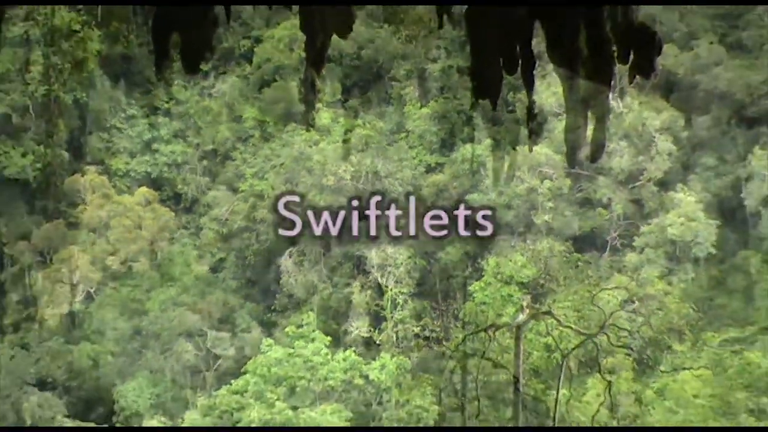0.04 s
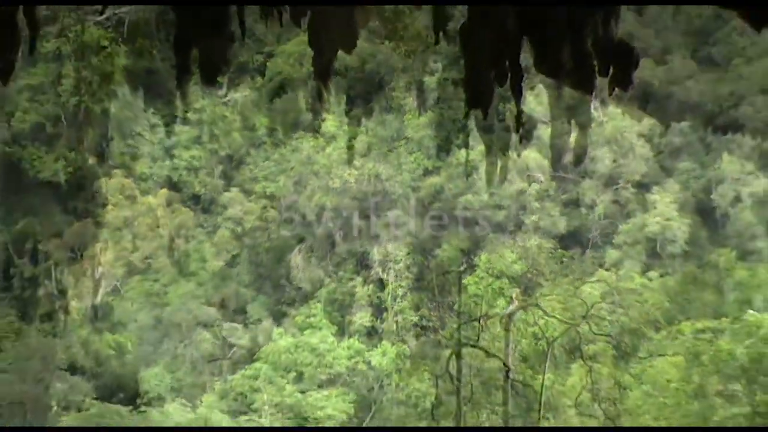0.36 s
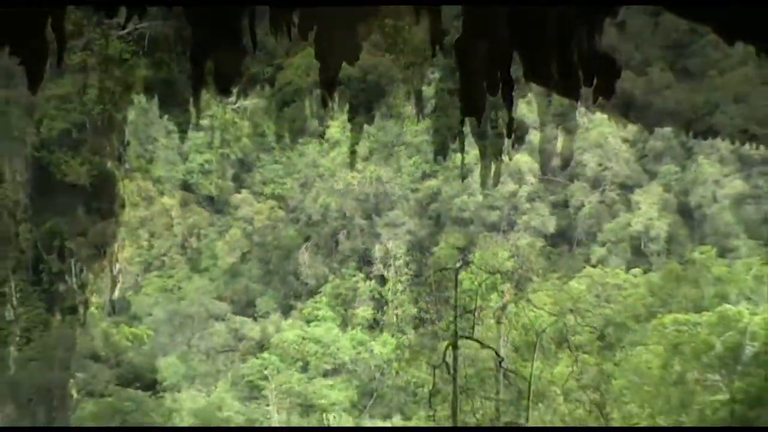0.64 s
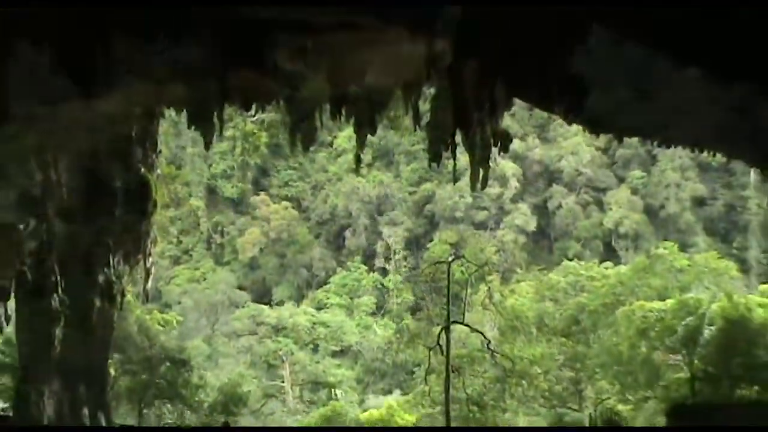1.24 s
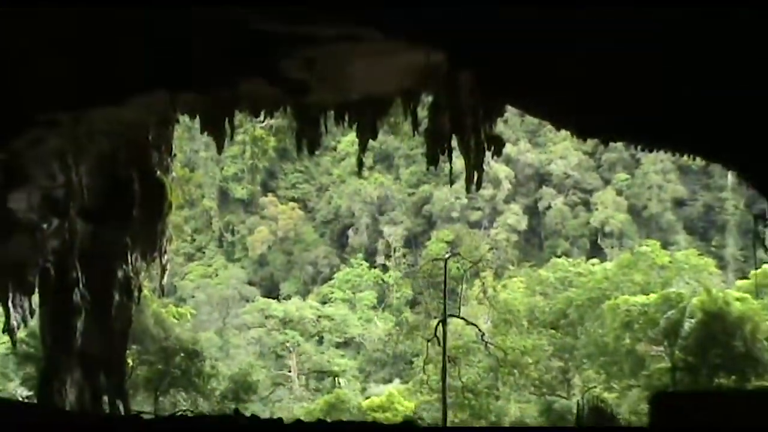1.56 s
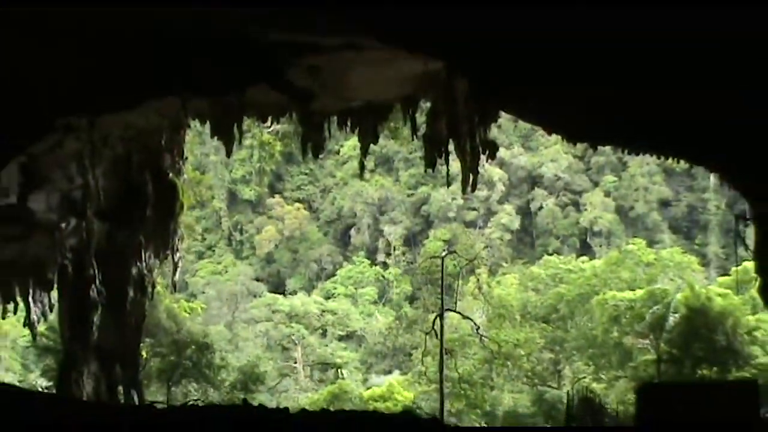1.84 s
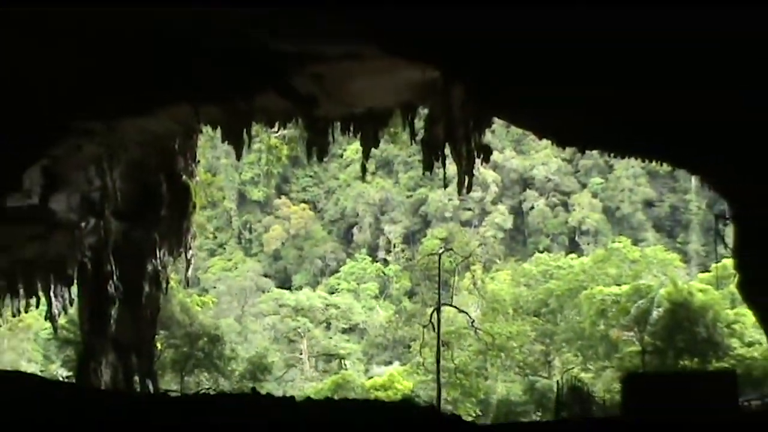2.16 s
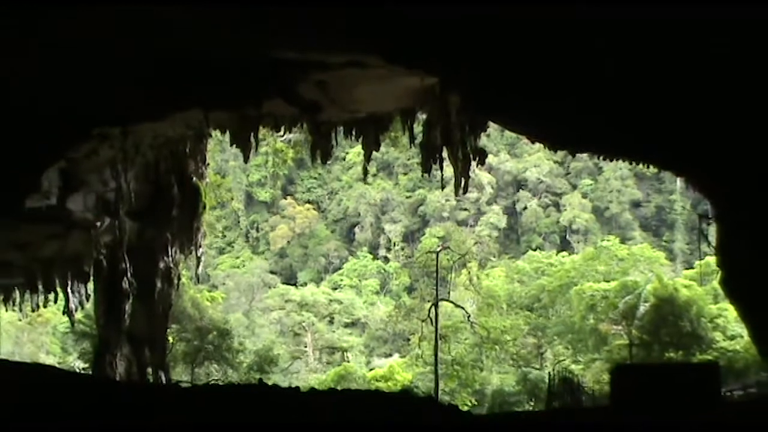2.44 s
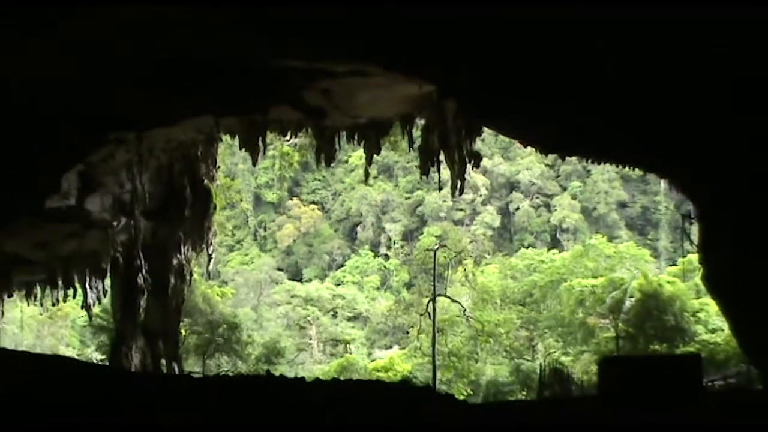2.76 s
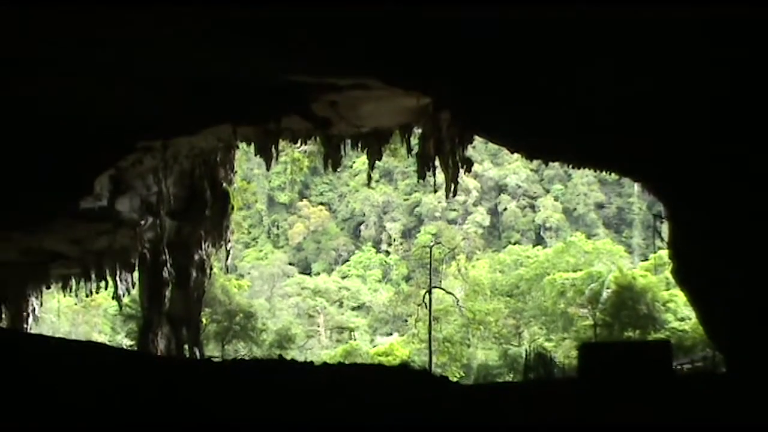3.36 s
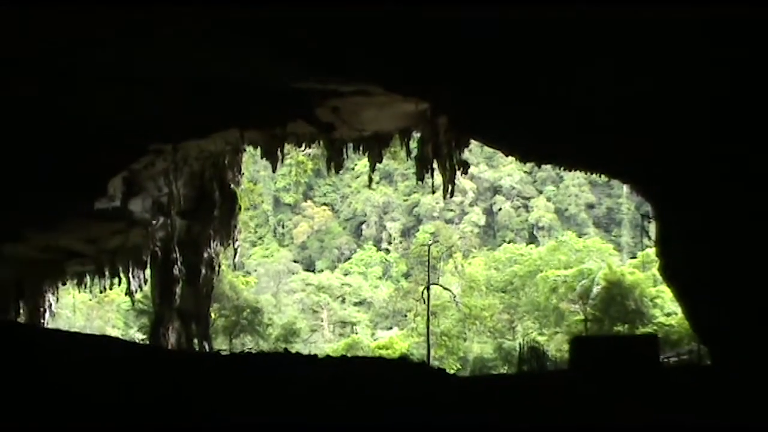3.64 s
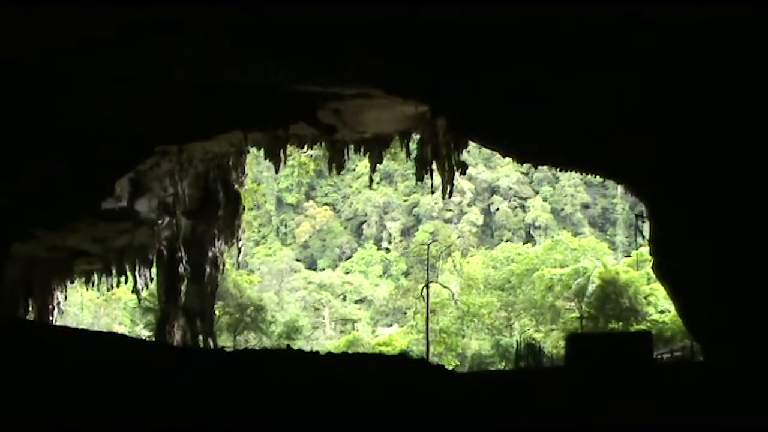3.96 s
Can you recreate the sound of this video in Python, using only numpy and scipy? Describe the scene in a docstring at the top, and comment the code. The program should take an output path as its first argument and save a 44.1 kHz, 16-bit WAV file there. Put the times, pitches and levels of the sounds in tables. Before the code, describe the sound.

Many small birds click and twitter in a cave, merging into a steady rain-like patter and hiss. Sharp clicks close to the microphone, brief squeals and one quick rattle stand out, echoing over a faint rumble of air.

```python
"""Swiftlets in a cave mouth

A colony echolocates with short pips near 6 kHz, which superpose into a rain-like patter and a hiss.
A few birds click close by; others chirp, twitter, squeal and rattle in brief, gliding tones.
Reflections from the rock prolong the calls, over a low rumble of air and a few soft knocks and scuffs."""
import sys
import numpy as np
from scipy import signal
from scipy.fft import rfft, irfft
from scipy.io import wavfile
from scipy.ndimage import uniform_filter1d

SR = 44100
rng = np.random.default_rng(int(sys.argv[2]) if len(sys.argv) > 2 else 0)


def waveform_to_disk(signal):
    """Save audio, clipped to [-1, 1], as 16-bit WAV at the path in sys.argv[1]."""
    frames = np.transpose(np.atleast_2d(signal))
    scaled = np.clip(frames, -1, 1) * 32767
    samples = np.round(scaled).astype(np.int16)
    wavfile.write(sys.argv[1], SR, samples)


N = 176400
TIME = np.arange(N) / SR
SIDE_DB = -11  # side relative to middle, for the birds and their echoes
WAVER = .024  # rms pitch deviation of a call, as a fraction


def amp(db):
    """Decibels to amplitude ratio."""
    return 10 ** (np.asarray(db) / 20)


def unit(x):
    """Normalisation to an rms of 1."""
    return x / np.sqrt(np.mean(x ** 2) + 1e-20)


def curve_at(points, hz):
    """Interpolation on a logarithmic frequency axis."""
    f, value = np.transpose(points)
    return np.interp(np.log(hz + 1), np.log(f + 1), value)


def add(mix, start, sound):
    """Superposition: a sound joins the mix at a time in seconds."""
    part = mix[..., max(round(start * SR), 0):][..., :sound.shape[-1]]
    part += sound[..., :part.shape[-1]]


def stereo(mid, side):
    """Sum and difference of middle and side give left and right."""
    return np.array([mid + side, mid - side])


def filtered(x, gains):
    """Linear filtering: each frequency is scaled by a gain curve in dB."""
    return irfft(rfft(x) * amp(curve_at(gains, np.fft.rfftfreq(N, 1 / SR))), N)


def noise(spectrum, patch_db=0, flicker_db=0):
    """Modulated noise of rms 1: its level drifts in patches of the spectrum and flickers as a whole."""
    bands = signal.stft(filtered(rng.standard_normal(N), spectrum), nperseg=256, noverlap=192)[2]
    patches = uniform_filter1d(rng.standard_normal(bands.shape), size=5, axis=0)
    patches = unit(uniform_filter1d(patches, size=28, axis=1))
    flicker = unit(uniform_filter1d(rng.standard_normal(bands.shape[1]), size=24))
    bands *= amp(patch_db * patches + flicker_db * flicker)
    return unit(signal.istft(bands, nperseg=256, noverlap=192)[1][:N])


def reflections(mid, side):
    """A diffuse stereo impulse response, normalised to unit energy in the middle."""
    return stereo(mid, amp(SIDE_DB) * side) / np.linalg.norm(mid)


# Each row: frequency in Hz, time to decay by 60 dB in seconds.
REVERB_TIMES = [(500, 3.1), (3000, 1.8), (6000, 0.87), (12000, 0.46)]
def cave(x, wet_db):
    """Reverberation: diffuse reflections decay exponentially, fastest in the treble."""
    hz, t, bands = signal.stft(rng.standard_normal((2, SR)), SR, nperseg=256)
    decay = amp(-60 * t / curve_at(REVERB_TIMES, hz)[:, None])
    tail = reflections(*signal.istft(bands * decay, SR, nperseg=256)[1])
    return x + amp(wet_db) * signal.fftconvolve(np.atleast_2d(x), tail, axes=1)[:, :N]


def ledges(x, direct_db, decay_s=.011):
    """Scattering: ledges around a hidden bird give its call a short, rough trail."""
    t = np.arange(SR // 10) / SR
    trail = reflections(*rng.standard_normal((2, len(t))) * np.exp(-t / decay_s))
    response = trail + amp(direct_db) * (t == 0)
    return signal.fftconvolve(x[None], response, axes=1)[:, :N] / np.hypot(1, amp(direct_db))


# Middle and side spectra of the air. Each row: frequency in Hz, relative spectral density in dB.
AIR_MID_SPECTRUM = [(15, -21), (30, -8), (52, -1.5), (100, -4.5), (170, -10), (400, -13.5), (1000, -17),
                    (2000, -17.5), (5000, -52)]
AIR_SIDE_SPECTRUM = [(15, -33), (55, 1), (120, -1.5), (250, 4.5), (500, 7.5), (1000, 9.5), (2000, 5),
                     (5000, -46)]
def air(pan_db=-.5):
    """Decorrelation: independent middle and side noises make the rumble of cave air sound wide."""
    rumble = stereo(amp(-57) * noise(AIR_MID_SPECTRUM), amp(-61.5) * noise(AIR_SIDE_SPECTRUM))
    return rumble * amp([[pan_db / 2], [-pan_db / 2]])


# Each row: frequency as a multiple of the click's pitch, relative level in dB.
CLICK_PARTIALS = [(.5, -18), (1.001, 2), (1.42, -13), (1.93, -25)]
CLICK_LEAD_S = .002  # time before the peak
def click(hz, half_length_s=.00047, rise=.139, sweep_s=.00074, scatter_s=.0057):
    """An echolocation pulse: a few cycles sweep upwards, then scatter from the nearest rock."""
    t = np.arange(-CLICK_LEAD_S, .03, 1 / SR)
    cycles = np.cumsum(hz * (1 + rise * np.tanh(t / sweep_s))) / SR
    tone = sum(amp(db) * np.sin(2 * np.pi * (k * cycles + rng.random())) for k, db in CLICK_PARTIALS)
    pulse = tone / np.cosh(np.minimum(1.27 * t / half_length_s, 20))
    scatter = reflections(*rng.standard_normal((2, len(t))) * np.exp(-t / scatter_s) * (t > -.001))
    return pulse + amp(-5) * signal.fftconvolve(pulse[None], scatter, axes=1)[:, :len(t)]


# The farthest birds. Each row: frequency in Hz, relative spectral density in dB.
HISS_SPECTRUM = [(300, -47), (1100, -30.5), (1500, -17.5), (2400, -15), (3100, -10), (3900, -10),
                 (4700, -5.5), (5800, -1), (6550, -4), (7900, -12.5), (9200, -20.5), (10500, -27),
                 (13000, -33), (15500, -36.5)]
# Each row: time in seconds, gain of the whole colony in dB.
COLONY_SWELL = [(0, 0), (.3, 1), (.44, -1), (.6, 0.1), (1.25, 1), (1.8, 0.54), (2.1, 0.2), (2.6, 0),
                (3.0, 0), (3.2, -0.8), (3.6, -0.3), (4, -0.5)]
def colony(voices=40, pairs_per_s=300, centre_hz=5956, pair_gap_s=.016):
    """Incoherent summation: randomly timed click pairs form a patter, and the farthest merge into hiss."""
    patter = np.zeros((2, N))
    for detune in rng.permutation(np.linspace(-.089, .089, voices)):
        onsets = rng.random(N) < pairs_per_s / voices / SR
        train = onsets * amp(3.9 * np.minimum(rng.exponential(1, N), 3))
        gap = round(pair_gap_s * rng.uniform(.5, 1.5) * SR)
        pairs = amp(-7.5) * train + np.roll(train, gap)  # the first of a pair is weaker
        pan = rng.uniform(-1.05, 1) * amp(SIDE_DB)
        clicks = signal.oaconvolve(pairs[None], click(centre_hz * (1 + detune)), axes=1)[:, :N]
        patter += stereo(1, pan)[:, None] * clicks
    hiss = stereo(noise(HISS_SPECTRUM, patch_db=1.06, flicker_db=.5), amp(SIDE_DB) * noise(HISS_SPECTRUM))
    swell = amp(np.interp(TIME, *np.transpose(COLONY_SWELL)))
    return swell * (amp(-36.5) * hiss + amp(-39) * unit(cave(patter, wet_db=-4.5)))


def whistle(length, start_hz, end_hz, waver=WAVER, overtone_db=-60):
    """Frequency modulation: a tone glides and wavers, with a weak partial a fifth above."""
    progress = np.linspace(0, 1, max(round(length * SR), 2))
    wobble = unit(uniform_filter1d(rng.standard_normal(SR // 2), size=30))[:len(progress)]
    hz = (start_hz + (end_hz - start_hz) * progress) * (1 + waver * wobble)
    phase = 2 * np.pi * np.cumsum(hz) / SR
    envelope = np.sqrt(abs(np.sin(np.pi * progress)))
    return envelope * (np.sin(phase) + amp(overtone_db) * np.sin(3 * phase / 2))


def chirps(per_s=70, centre_hz=6250, mean_length_s=.006, max_glide=.12):
    """A random point process: tiny rising or falling chirps arrive from all over the roof."""
    out = np.zeros((2, N))
    for when, size, slope, pan in rng.random((round(per_s * N / SR), 4)):
        hz = centre_hz * np.exp(.08 * rng.standard_normal())
        note = whistle(mean_length_s * (.5 + rng.random()), hz, hz * (1 + max_glide * (1 - 2 * slope)))
        balance = stereo(.92, (2 * pan - 1) * amp(SIDE_DB))[:, None]
        add(out, when * N / SR, amp(-33.5) * size * balance * note)
    return cave(out, wet_db=-4.5)


# Twitters, faint high overtones of calls (near 15 kHz) and the bright top edge of a close click (2.28 s).
# Each row: start in seconds, length in seconds, centre frequency in Hz, level in dB.
TREBLE_SOUNDS = [(0, .035, 11600, -47.5), (.10, 0.028, 11700, -49), (0.144, 0.014, 10000, -43),
                 (.718, 0.013, 12200, -50), (0.734, 0.0168, 10840, -43), (.815, 0.055, 11000, -49),
                 (0.845, .015, 9600, -41.5), (.97, .035, 15200, -54), (1.19, 0.04, 10000, -43.5),
                 (1.383, 0.033, 11800, -47.5), (1.405, 0.023, 10600, -43), (1.486, 0.043, 10800, -46),
                 (1.74, .04, 15000, -55), (2.278, .006, 10650, -42), (2.994, 0.052, 11200, -46.5),
                 (3.03, .04, 13600, -54), (3.253, 0.028, 15100, -54), (3.26, .016, 12700, -53),
                 (3.305, 0.027, 10500, -54), (3.897, .02, 10200, -51)]
def bird_treble(fall=.13, rasp=.078):
    """Spectral broadening: fast, random frequency modulation roughens the birds' highest sounds."""
    out = np.zeros((2, N))
    for start, length, hz, db in TREBLE_SOUNDS:
        glide = whistle(length, hz * (1 + fall / 2), hz * (1 - fall / 2), rasp)
        add(out, start, amp(db) * ledges(glide, direct_db=0))
    return cave(out, wet_db=-2.5)


# Each row: start in seconds, length in seconds, first and last pitch in Hz, level in dB.
SQUEAL_NOTES = [(0.034, 0.055, 7100, 6850, -32.5), (.532, 0.028, 6620, 6120, -29),
                (.635, 0.041, 6300, 6750, -32.5), (.683, 0.02, 7020, 7350, -35),
                (0.973, 0.026, 9200, 8160, -39), (1.005, 0.027, 6700, 5790, -29.5),
                (1.028, 0.0193, 5900, 5270, -35), (1.212, 0.022, 7600, 7080, -37),
                (1.579, 0.03, 8880, 7600, -37), (3.135, 0.025, 6950, 6760, -34),
                (3.307, 0.045, 7050, 6830, -32), (3.88, 0.032, 6840, 6560, -31),
                (3.905, 0.015, 8800, 8600, -41.5), (3.94, .016, 6800, 6750, -37)]
def squeals():
    """Shallow pitch modulation keeps these gliding calls narrow in band, so they sound tonal."""
    out = np.zeros((2, N))
    for start, length, start_hz, end_hz, db in SQUEAL_NOTES:
        note = whistle(length, start_hz, end_hz, overtone_db=-22)
        add(out, start, amp(db) * ledges(note, direct_db=0))
    return cave(out, wet_db=-1)


# Each row: time of the crest in seconds, level in dB.
BURST_CRESTS = [(.118, -32.5), (.137, -38), (.965, -46), (1.04, -32.5), (1.29, -35), (1.33, -34),
                (1.505, -35.5), (1.555, -37), (2.138, -35.5), (3.09, -36), (3.33, -41), (3.467, -41),
                (3.57, -42), (3.728, -35), (3.852, -38)]
# Each row: frequency in Hz, relative spectral density in dB.
BURST_SPECTRUM = [(2000, -29.5), (4000, -10), (5300, -4), (6200, 5.5), (7000, -5), (8000, -15), (9300, -12),
                  (12000, -32), (16000, -42)]
def click_bursts(rise_s=.0034, fall_s=.018):
    """Multipath propagation: clicks from mid-cave arrive as clouds of reflections whose powers add."""
    power = sum(amp(2 * db) * np.exp(-np.maximum((crest - TIME) / rise_s, (TIME - crest) / fall_s))
                for crest, db in BURST_CRESTS)
    return np.sqrt(power) * stereo(noise(BURST_SPECTRUM), amp(SIDE_DB) * noise(BURST_SPECTRUM))


# Each row: time of the peak in seconds, level in dB, pitch in Hz, left minus right in dB.
NEAR_CLICKS = [(.2973, -33, 7300, -2), (0.4692, -32, 7600, 0), (0.5081, -22, 6620, 0),
               (.5524, -24, 6040, 4), (.5900, -19.5, 5890, -3), (0.6387, -23, 6320, 0),
               (0.65, -21.5, 6480, 1), (.7666, -16.5, 6400, -3), (.7972, -27, 7250, 0),
               (.9321, -18, 6120, -1), (1.0116, -21.5, 6360, 2), (1.022, -25, 6040, 6),
               (1.0736, -27, 7600, 0), (1.1320, -18, 6190, -3), (1.2232, -25.5, 7200, 0),
               (1.3817, -14.3, 6250, -1), (1.4218, -30, 7500, 0), (1.4280, -25, 6280, 0),
               (1.5435, -30, 7900, 0), (1.627, -23.5, 7000, 0), (1.663, -22.5, 6440, 0),
               (1.6662, -20.5, 6400, 0), (1.7515, -22.5, 6000, 0), (1.7856, -23, 5800, -1),
               (1.9845, -28, 6960, 0), (2.2830, -26, 7100, -2), (2.3820, -22, 6040, 0),
               (2.5640, -24, 6320, -4), (3.1538, -29, 7030, -2), (3.6703, -23, 6300, -2),
               (3.6727, -20, 6050, 0), (3.8689, -19.5, 6350, 0), (3.8717, -19, 6100, 0),
               (3.88, -25, 6400, -6)]
def close_clicks():
    """Direct sound outweighs reverberation for birds passing close by, so each click stands out."""
    out = np.zeros((2, N))
    for peak, db, hz, pan_db in NEAR_CLICKS:
        add(out, peak - CLICK_LEAD_S, amp([[db + pan_db / 2], [db - pan_db / 2]]) * click(hz))
    return cave(out, wet_db=-5.5)


# One row: start in seconds, length in seconds, first and last pitch in Hz, initial level in dB.
RATTLE_RUN = (1.765, .21, 5800, 4850, -28.5)
def rattle(per_s=110, note_s=.003, fade_db=-1.5):
    """A pulse train: one bird runs its clicks together on a falling pitch."""
    start, length, start_hz, end_hz, db = RATTLE_RUN
    out = np.zeros(N)
    for progress in np.arange(0, 1, 1 / (per_s * length)):
        hz = (start_hz + (end_hz - start_hz) * progress) * (1 + WAVER * rng.standard_normal())
        onset = start + progress * length + rng.random() / per_s / 2
        add(out, onset, amp(db + fade_db * progress) * whistle(note_s, hz, hz))
    return cave(ledges(out, direct_db=-1), wet_db=-4)


# Each row: time of the peak in seconds, level in dB, pitch in Hz.
KNOCK_PULSES = [(2.063, -40.5, 850), (3.921, -33, 770)]
def knocks(half_length_s=.0006):
    """A short pulse has a broad spectrum: a cycle or two of tone is heard as a dull knock."""
    out = np.zeros(N)
    t = np.arange(-.005, .005, 1 / SR)
    envelope = np.exp(-(t / half_length_s) ** 2)
    for peak, db, hz in KNOCK_PULSES:
        add(out, peak + t[0], -amp(db) * np.cos(2 * np.pi * hz * t) * envelope)
    return out


# Each row: time of the crest in seconds, time to fall 9 dB in seconds, level in dB, centre in Hz.
SCUFF_PUFFS = [(2.07, 0.028, -64, 880), (3.24, 0.04, -58.5, 400)]
# Each row: frequency as a multiple of the centre, relative spectral density in dB.
SCUFF_SPECTRUM = [(.25, -10), (1, -1), (2, -9), (8, -50)]
def scuffs():
    """A low band of noise under a Gaussian envelope is heard as a brief, dull scuff."""
    out = np.zeros(N)
    for crest, width, db, hz in SCUFF_PUFFS:
        envelope = amp(db - 9 * np.minimum(((TIME - crest) / width) ** 2, 20))
        out += envelope * noise([(k * hz, level) for k, level in SCUFF_SPECTRUM])
    return out


# Each row: start in seconds, length in seconds, first and last pitch in Hz, level in dB.
FAR_NOTES = [(3.151, .04, 2560, 2680, -47), (3.175, 0.06, 2270, 2160, -48), (3.3, 0.1, 2620, 2200, -50),
             (3.594, .085, 2480, 2170, -50), (3.765, 0.041, 2200, 2100, -50)]
def far_bird():
    """Reflected sound outweighs direct sound, blurring the lower calls of a distant bird."""
    out = np.zeros((2, N))
    for start, length, start_hz, end_hz, db in FAR_NOTES:
        note = whistle(length, start_hz, end_hz, waver=.035)
        add(out, start, amp(db) * ledges(note, direct_db=-1))
    return cave(out, wet_db=-4)


def scene():
    """Superposition: the pressures of air, birds, knocks and scuffs add."""
    return (air() + colony() + chirps() + bird_treble() + squeals() + click_bursts() + close_clicks()
            + rattle() + knocks() + scuffs() + far_bird())


# Each row: frequency in Hz, gain of the side signal in dB.
STEREO_WIDTH = [(100, 5.5), (500, 3.5), (1000, 0.5), (2200, 3), (5000, -0.5), (9000, 1), (11500, -15.5)]
def record(dry, cutoff_hz=15850):
    """Filtering the side signal widens the bass and narrows the top treble; a low-pass limits the band."""
    side = filtered((dry[0] - dry[1]) / 2, STEREO_WIDTH)
    lowpass = signal.firwin(1023, cutoff_hz, window=("kaiser", 9), fs=SR)
    return signal.oaconvolve(stereo(dry.mean(0), side), lowpass[None], "same")


dry = scene()
out = record(dry)
waveform_to_disk(out)
```